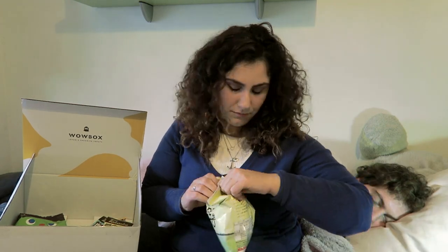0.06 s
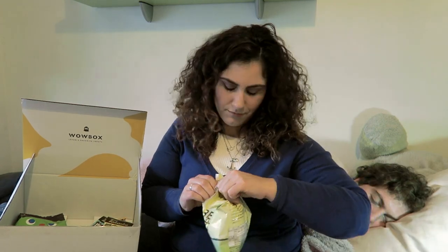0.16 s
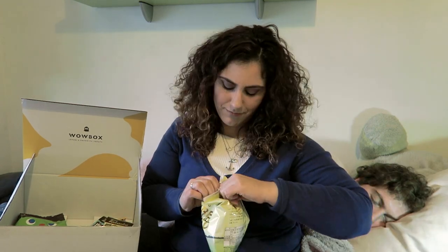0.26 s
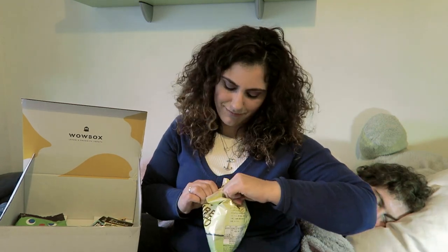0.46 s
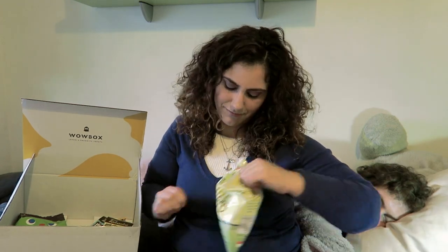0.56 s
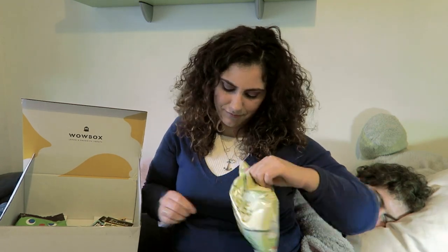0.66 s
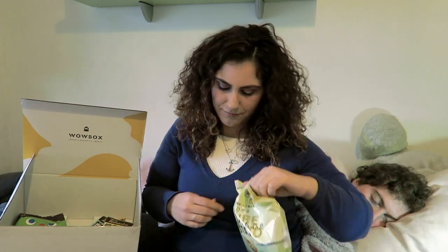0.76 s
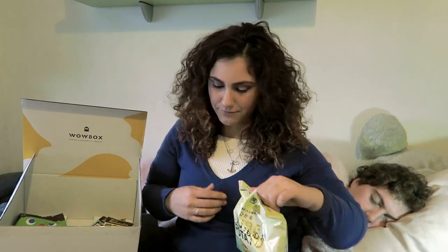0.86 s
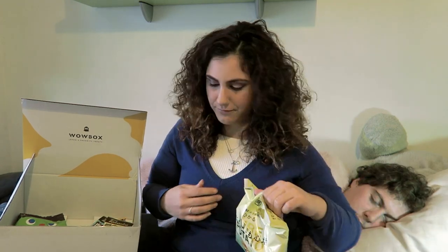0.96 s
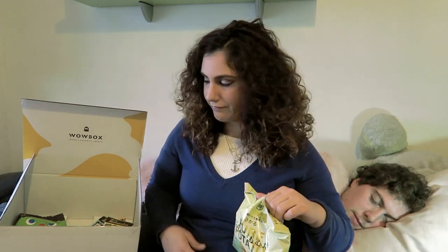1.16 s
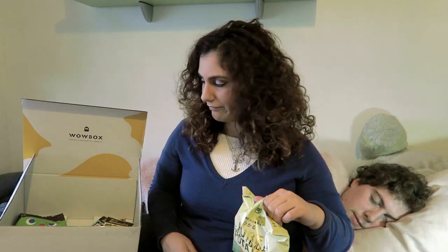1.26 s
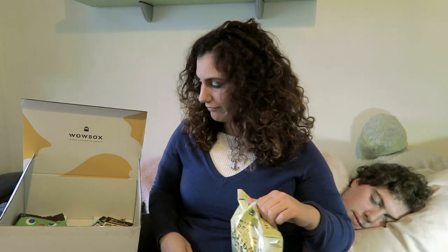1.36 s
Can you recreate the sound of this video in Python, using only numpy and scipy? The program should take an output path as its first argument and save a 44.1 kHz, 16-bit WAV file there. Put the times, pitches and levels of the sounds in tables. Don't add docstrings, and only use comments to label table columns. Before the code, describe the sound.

A thin plastic snack packet crackles and snaps sharply as it is pulled open in a bedroom

```python
import sys
import numpy as np
from scipy import signal
from scipy.fft import rfft, irfft
from scipy.io import wavfile

SR = 44100
rng = np.random.default_rng(int(sys.argv[2]) if len(sys.argv) > 2 else 0)


def to_wav(sig):
    pcm = np.clip(np.atleast_2d(sig), -1, 1) * 32767
    pcm = np.round(pcm).astype(np.int16)
    wavfile.write(sys.argv[1], SR, pcm.T)


def to_linear_factor(level_db):
    exponent = np.asarray(level_db, float) / 20
    return 10 ** exponent


N = 61739
LEAD_S = 0.3
FACET_ROOM_DB = -9

# (frequency [Hz], side minus mid [dB])
ROOM_WIDTH = [(100, -20), (600, -10.5), (1500, -26.5), (3000, -14.5), (6000, 0.5), (14000, 6)]


def rms_one(x):
    return x / np.sqrt(np.mean(x ** 2) + 1e-20)


def at_hz(points, hz):
    table_hz, values = np.array(points).T
    return np.interp(np.log(np.maximum(hz, 1)), np.log(table_hz), values)


def colour(x, spectrum):
    size = 4096
    response_db = at_hz(spectrum, np.fft.rfftfreq(size, 1 / SR))
    cepstrum = irfft(np.log(to_linear_factor(response_db)))
    cepstrum[1:size // 2] *= 2
    cepstrum[size // 2 + 1:] = 0
    impulse = irfft(np.exp(rfft(cepstrum)))
    coloured = signal.fftconvolve(np.atleast_2d(x), impulse[None], axes=1)
    return coloured[:, :x.shape[-1]].reshape(x.shape)


def ring(clicks, hz, t60):
    decay, turn = to_linear_factor(-60 / (t60 * SR)), 2 * np.pi * hz / SR
    return signal.lfilter([0, np.sin(turn)], [1, -2 * decay * np.cos(turn), decay ** 2], clicks + 1e-18)


def high(x, hz):
    return signal.sosfilt(signal.butter(2, hz, "high", fs=SR, output="sos"), x)


def between(x, low_hz, top_hz, order=2):
    return signal.sosfilt(signal.butter(order, [low_hz, top_hz], "band", fs=SR, output="sos"), x)


def crackle():
    # (time [s], crackle level [dB], brightness [dB])
    handling = [(0, -34, -1), (0.063, -45.5, 6.5), (0.103, -31.5, 0.5), (.15, -30, 3), (.2, -23.5, 7),
                (.26, -26.5, 5), (0.332, -30.5, 10.5), (.42, -36.5, 6), (0.476, -31.5, 10),
                (0.519, -25.5, 12.5), (0.559, -37, 17), (0.622, -32, -5), (0.642, -22, 9.5),
                (0.684, -34.5, -3), (.73, -32.5, 16.5), (.8, -36.5, -10), (0.868, -38.5, 3), (.93, -68, 21)]
    # (frequency [Hz], level [dB per Hz])
    crackle_tone = [(59, -53), (100, -34.5), (255, -8), (358, -9), (1130, -3), (2990, -8.5), (12100, -38),
                    (14700, -43.5), (16000, -52)]
    folds_per_s, size_spread_db, clump_db, ring_cycles = 10000, 4.5, 1.5, 4.24
    level_db, bright_hz, let_go_s = -1, 4000, 0.95

    s, work_db, bright_db = np.transpose(handling)
    t = np.arange(-int(LEAD_S * SR), N) / SR
    work_db, bright_db = np.interp(t, s, work_db), np.interp(t, s, bright_db)

    clump = np.interp(t * 90 + 40, np.arange(240), rng.standard_normal(240))
    born = rng.random(len(t)) < folds_per_s * to_linear_factor(clump_db * clump) / SR
    sizes = to_linear_factor(size_spread_db * np.minimum(rng.exponential(1, len(t)), 4))
    clicks = born * sizes * rng.choice([-1, 1], len(t))

    pitches = np.geomspace(130, 15000, 24)
    share = pitches ** 0.8 / np.sum(pitches ** 0.8)
    dealt = np.searchsorted(np.cumsum(share), rng.random(len(t)))
    folds = 0
    for k, hz in enumerate(pitches):
        folds = folds + ring(clicks * (dealt == k), hz, ring_cycles / hz) * hz ** 0.5

    folds = rms_one(colour(folds, crackle_tone))
    folds = folds + (to_linear_factor(bright_db) - 1) * high(folds, bright_hz)
    let_go = np.clip((let_go_s - t) / 0.015, 0, 1)
    return to_linear_factor(work_db + level_db) * folds * let_go


def bedroom(x):
    # (frequency [Hz], t60 [s])
    room_t60 = [(150, 0.62), (2500, 0.32), (6000, 0.48), (14000, 0.14)]
    # (frequency [Hz], level [dB])
    room_tint = [(200, -2), (1200, -1.5), (2500, -0.5), (3500, -3), (4800, -1.5), (6500, 2.5), (12000, 0)]
    room_db, first_echo_s, build_s = -6.5, 0.0013, 0.0012

    t, tail = np.arange(SR) / SR, 0
    white = rng.standard_normal((2, 2, SR))
    band_hz = 60 * 2 ** np.arange(0, 8.2, 0.8)
    for k, (low, top) in enumerate(zip(band_hz, band_hz[1:])):
        t60 = at_hz(room_t60, np.sqrt(low * top))
        tail = tail + between(white[k % 2], low, top) * to_linear_factor(-60 * t / t60)
    tail = tail * np.clip((t - first_echo_s) / build_s, 0, 1)
    tail = tail / np.sqrt(np.sum(tail[0] ** 2))
    mid, side = signal.fftconvolve(colour(x, room_tint)[None], tail, axes=1)[:, :len(x)]
    return to_linear_factor(room_db) * (mid + colour(side, ROOM_WIDTH) * [[1], [-1]])


def room_tone():
    # (frequency [Hz], level [dB])
    hush_tone = [(25, 3), (300, 1.5), (700, -4), (2400, -9.5), (5400, -18), (5900, -23), (12000, -34),
                 (15000, -62)]
    # (frequency [Hz], side minus mid [dB])
    hush_width = [(60, -12), (180, 4), (550, 5), (1650, -3), (4970, -3.5), (15000, 5)]
    hush_db, settle = -53.5, 4096

    mid, side = colour(rng.standard_normal((2, N + settle)), hush_tone)
    stereo = mid + colour(side, hush_width) * [[1], [-1]]
    return to_linear_factor(hush_db) / mid[settle:].std() * stereo[:, settle:]


def rustles():
    # (time [s], level [dB], centre [Hz], fade t60 [s])
    settlings = [(0.63, -48, 6000, 0.27), (.512, -35, 4400, 0.38), (.545, -45, 5700, 0.31),
                 (0.9, -41.5, 4500, 0.37), (1.113, -48.5, 2230, .5), (1.128, -53, 3830, 0.24),
                 (0.82, -43, 6500, 0.18), (0.024, -58.5, 11000, 0.98), (.89, -37.5, 2270, .35),
                 (.637, -35, 3900, 0.19), (.187, -21.5, 3300, 0.29), (.565, -39, 2300, 0.26)]
    width_oct, rise_s, folds_per_s, side_db = 0.54, 0.0031, 12000, -4

    t, out = np.arange(N) / SR, 0
    grains = rng.standard_normal((2, N)) * (rng.random((2, N)) < folds_per_s / SR)
    half_width = 2 ** (width_oct / 2)
    for k, (s, db, hz, t60) in enumerate(settlings):
        since = np.maximum(t - s, 0)
        shifted = np.roll(grains, 3001 * k, axis=1)
        band = rms_one(between(shifted, hz / half_width, hz * half_width, order=3))
        out = out + band * to_linear_factor(db - 60 * since / t60) * np.clip(since / rise_s, 0, 1)
    mid, side = out
    return mid + to_linear_factor(side_db) * colour(side, ROOM_WIDTH) * [[1], [-1]]


def thumps():
    # (time [s], peak [dB], pitch [Hz], ring t60 [s])
    air_thumps = [
        (0.108, -25, 870, 0.047),
        (0.14, -26, 830, 0.039),
        (0.185, -21.5, 470, 0.035),
        (0.241, -26.5, 815, 0.11),
        (0.507, -27, 780, 0.027),
        (0.634, -26.5, 764, 0.11),
        (0.664, -27.5, 841, 0.1),
        (0.886, -32.5, 453, 0.031),
        (1.114, -51, 245, 0.11),
    ]
    # (time [s], peak [dB], pitch [Hz], ring t60 [s])
    bag_flexes = [
        (0.152, -35.5, 158.3, 0.18),
        (0.237, -35, 182, 0.059),
        (.3, -35, 120, 0.066),
        (0.629, -44, 130, 0.12),
        (0.656, -35.5, 164, 0.15),
        (1.03, -49, 271, 0.115),
        (1.117, -39.5, 980, 0.041),
        (.986, -46.5, 300, .06),
        (1.181, -54, 263, 0.12),
    ]
    push_db, push_samples = 1.5, 40

    out = np.zeros(N)
    for s, db, hz, t60 in [*air_thumps, *bag_flexes]:
        push, start = np.zeros(N), int(s * SR)
        push[start:start + push_samples] = to_linear_factor(db + push_db) * np.hanning(push_samples) / 16
        body = ring(push, hz, t60) + 0.5 * ring(push, 1.7 * hz, 0.69 * t60)
        out += high(body, 0.41 * hz)
    return out


def snaps():
    # (time [s], peak [dB], pitch
    # [Hz], tear length [ms], treble [dB])
    creases = [(0.1092, -14.9, 2800, 1.3, -32.8), (0.1419, -17.4, 904.0, 0.81, -21.0),
               (0.1657, -8.5, 2400.0, 0.23, -26.9), (0.1849, -6.5, 3660, 1.6, -16),
               (0.1916, -12.8, 990.0, 0.28, -19.5), (0.2183, -9.1, 2600, 0.14, -29.8),
               (0.2293, -9.3, 3200, 0.4, -22.8), (0.2405, -11.4, 1119.0, 1.39, -26.8),
               (0.246, -11.6, 1873.0, 0.59, -26.3), (0.2889, -14.5, 1900, 0.2, -21.4),
               (0.2945, -17.4, 1205.0, 0.37, -15), (0.3366, -5.5, 2540.0, 0.27, -12),
               (0.3435, -16.3, 2600, 0.1, -10.4), (0.3805, -20.6, 1033.0, 0.62, -20.9),
               (0.3923, -18.5, 2217.0, 0.3, -29.6), (0.4281, -10.7, 2906.0, 0.1, -36.3),
               (0.4763, -19.0, 1808.0, 0.23, -17.8), (0.4864, -16.5, 4300.0, 0.1, -16.4),
               (0.4924, -15.5, 4200, 0.1, -21.4), (0.4964, -15.5, 3300, 0.1, -21.4),
               (0.5007, -16.7, 2600, 0.1, -16.5), (0.5042, -13.7, 2800, 0.1, -21.9),
               (0.5083, -11, 2110.0, 0.75, -22.8), (0.5135, -11.0, 2950.0, 0.2, -20.3),
               (0.5967, -21, 2993.0, 0.18, -20.4), (0.6316, -0.7, 3057.0, 0.46, -25),
                    (0.6366, -7, 2820.0, 1.0, -27.6), (0.6411, -13, 1500, 0.15, -19.4),
                    (0.6508, -13.0, 2756.0, 0.37, -20.8), (0.6686, -17.2, 904.0, 0.74, -24.7),
                    (0.6901, -11.2, 2562.0, 0.49, -40), (0.7112, -5.6, 2648.0, 0.1, -38.0),
                    (0.7211, -8.7, 2024.0, 0.31, -32), (0.7675, -13.9, 2067.0, 0.22, -30.5),
                    (0.7727, -16.5, 3251.0, 0.16, -27.8), (0.7795, -5.1, 3251.0, 0.1, -26.3),
                    (0.7895, -15.1, 2024.0, 0.17, -22.2), (0.8157, -20.5, 1076.0, 0.41, -29.0),
                    (0.8871, -7.5, 2420, 0.1, -30), (1.1164, -38, 2650, 0.34, -35.3),
                    (1.12, -33, 2519.0, 0.5, -47.9)]
    # (frequency [Hz], level [dB per Hz])
    tick_tone = [(300, -33), (900, -10.5), (1700, -0.5), (2600, -2), (3500, -4.5), (4600, -9.5),
                 (5700, -24), (8500, -42.5)]
    first_slip, tear_stretch, spit_ms = 2.2, 1.6, 1
    panel_db, panel_q, snap_db, treble_trim_db = 4, 5.3, 1.83, -4.5
    length = 2048

    def peak_one(v):
        return v / np.abs(v).max()

    out, ms = np.zeros(N + length), np.arange(length) / SR * 1000
    for s, db, hz, tear_ms, treble_db in creases:
        slips, spit = rng.standard_normal((2, length))
        tear = np.exp(-ms / (tear_ms * tear_stretch)) * slips * np.abs(slips) * min(tear_ms, 0.8) / 2.5
        tear[0] = first_slip
        tick = colour(tear, tick_tone)
        panel = signal.lfilter(*signal.iirpeak(hz, panel_q, SR), tick)
        panel_gain = to_linear_factor(panel_db - at_hz(tick_tone, hz))
        snap = peak_one(tick + panel_gain * panel)

        spit = between(spit * np.exp(-ms / (spit_ms + tear_ms)), 9200, 13260, order=3)
        snap += to_linear_factor(treble_db + treble_trim_db) * peak_one(spit)
        start = int(s * SR)
        out[start:start + length] += to_linear_factor(db + snap_db) * snap
    return out[:N]


def facets():
    # (time [s], peak [dB], pitch [Hz], ring t60 [s])
    bucklings = [(.1848, -13.5, 994, 0.012), (.1852, -14.5, 3070, 0.0095), (.1915, -15, 1000, 0.0097),
                 (0.1657, -18, 457, 0.021), (.5078, -12.5, 2090, 0.0061), (.6362, -6, 2834, 0.0073),
                 (.6378, -9.5, 2100, 0.0071), (.639, -18, 932, 0.011), (.644, -21, 810, 0.0087),
                 (.663, -30.5, 855, .02), (.8868, -17, 2286, 0.0048), (.8868, -22, 4090, 0.0039),
                 (1.1198, -30, 2500, 0.0037), (1.1198, -40.5, 3940, .005), (1.125, -38, 1970, .008),
                 (1.1285, -41, 2080, 0.0068), (0.4702, -24, 1970, 0.0061), (.531, -26, 697, 0.0092),
                 (1.114, -40, 235, 0.047), (.385, -32, 426, 0.026), (.415, -34, 407, 0.033)]
    length = 4096

    out, click = np.zeros(N + length), np.eye(1, length)[0]
    for s, db, hz, t60 in bucklings:
        swell = ring(ring(click, hz, t60), hz, t60)
        start = int(s * SR)
        out[start:start + length] += to_linear_factor(db) * swell / np.abs(swell).max()
    return out[:N]


def scene():
    buckles = facets()
    packet = crackle()
    packet[-N:] += snaps() + thumps() + to_linear_factor(FACET_ROOM_DB) * buckles
    packet = high(packet, 178)
    aimed = (1 - to_linear_factor(FACET_ROOM_DB)) * buckles
    return (packet + bedroom(packet))[:, -N:] + aimed + room_tone() + rustles()


def band_limit(x):
    return signal.sosfilt(signal.butter(12, 16520, fs=SR, output="sos"), x)


def record(dry):
    rounded = 1.199 * np.tanh(dry / 1.252)
    rolled = signal.sosfilt(signal.butter(4, 15600, fs=SR, output="sos"), rounded)
    return band_limit(rolled)


dry = scene()
out = record(dry)
to_wav(out)
```